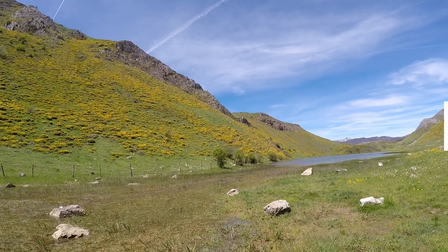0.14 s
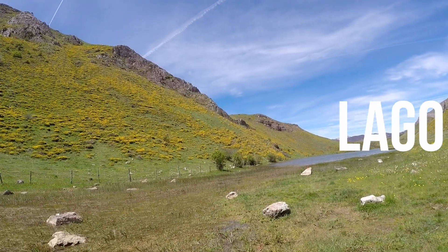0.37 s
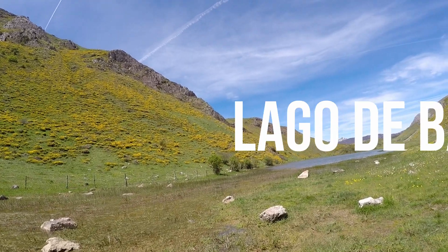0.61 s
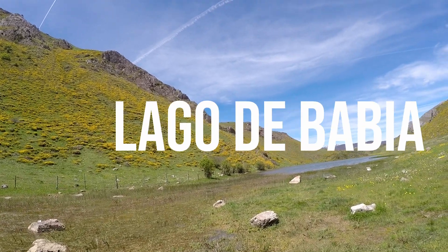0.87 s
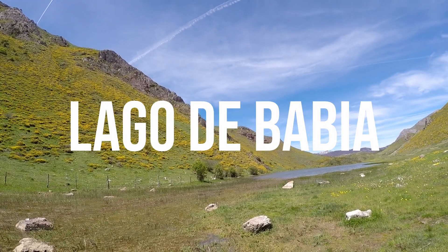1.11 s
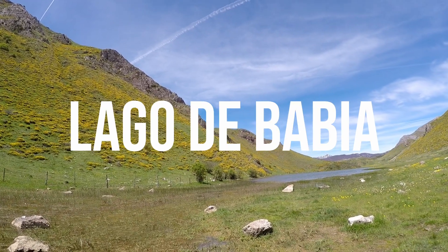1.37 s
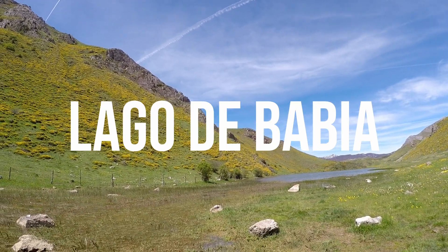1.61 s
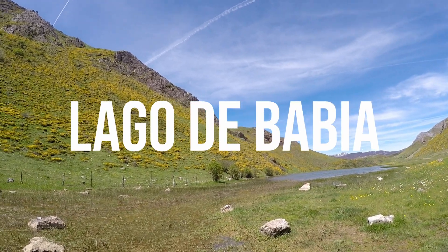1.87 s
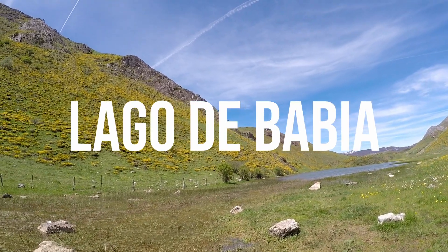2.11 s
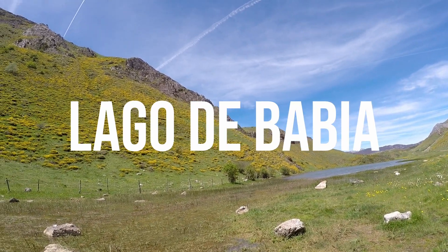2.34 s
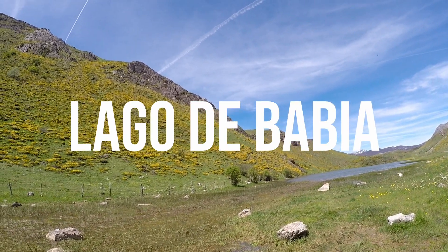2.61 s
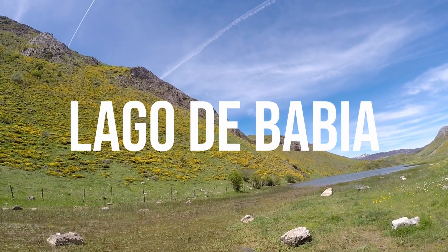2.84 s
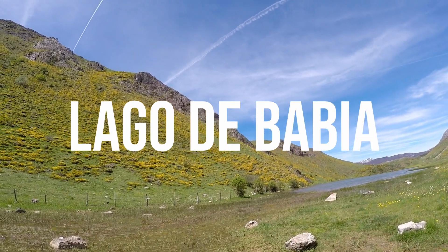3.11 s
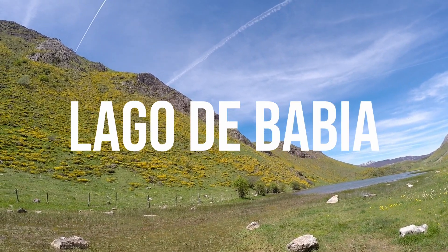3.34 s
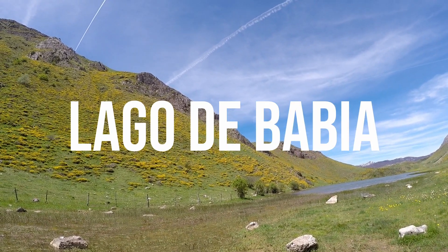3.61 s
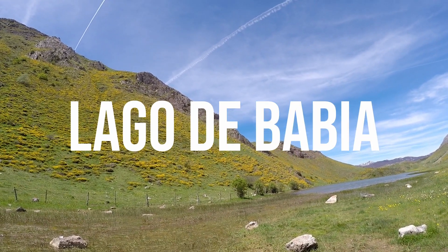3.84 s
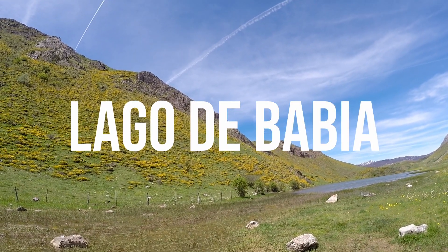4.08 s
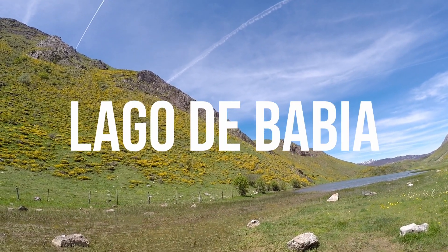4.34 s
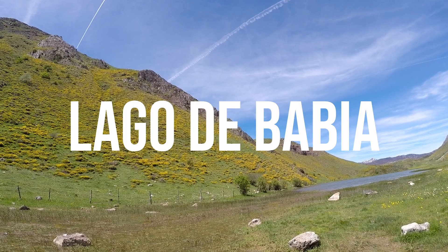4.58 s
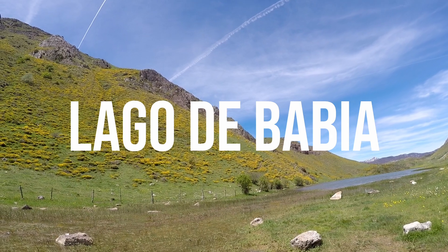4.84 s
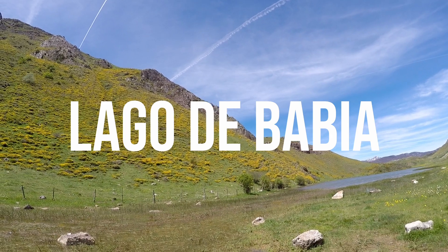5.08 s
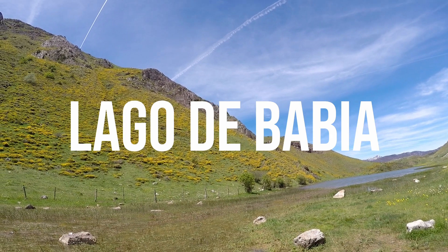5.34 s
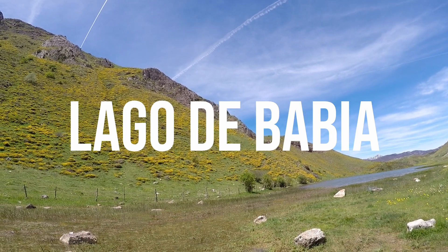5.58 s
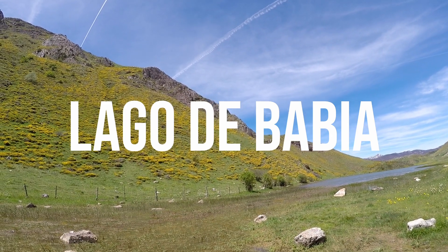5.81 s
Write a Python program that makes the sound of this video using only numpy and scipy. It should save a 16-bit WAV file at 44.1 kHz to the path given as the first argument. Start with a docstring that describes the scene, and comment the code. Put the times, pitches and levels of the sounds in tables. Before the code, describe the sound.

Near frogs give dry, ringing, ratchet-like croaks over a grainy blur of farther ones, with wind buffeting the microphone outdoors.

```python
"""A chorus of frogs rattles by a lake while gusts of wind buffet a small microphone.
Each croak is a run of short bursts of clicks that ring in a vocal sac, swelling and fading.
Near and shrill frogs stand out over a blur of farther ones; hoarse moans are quicker buzzes of clicks.
Shaped noise makes the wind, the air and a few dry ticks; steady tones make two thin insect chirps."""
import sys
import numpy as np
from scipy import signal
from scipy.io import wavfile
from scipy.ndimage import uniform_filter1d

SR = 44100
rng = np.random.default_rng(int(sys.argv[2]) if len(sys.argv) > 2 else 0)


def store_wav(level_fs):
    """Save 16-bit WAV to argv[1]."""
    pcm = np.round(np.clip(np.atleast_2d(level_fs), -1, 1) * 32767)
    wavfile.write(sys.argv[1], SR, pcm.T.astype(np.int16))


def invert_db(x):
    """Field ratio 10**(x/20) for x, a level in decibels (scalar or array-like)."""
    u = np.asarray(x, float) / 20
    return 10 ** u


N = 262395  # length in samples, just under 6 s


def evened(x):
    """Scales to rms 1."""
    return x / np.sqrt(np.mean(x ** 2) + 1e-20)


def over_time(table):
    """Joins the points of each column by straight lines, one value a sample."""
    s, *columns = np.transpose(table)
    return [np.interp(np.arange(N) / SR, s, column) for column in columns]


def around(s):
    """The samples that a run of bursts occupies, with 0.1 s to spare at each end."""
    return slice(max(round((s[0] - .1) * SR), 0), round((s[-1] + .1) * SR))


def bursts(s, db, gap, last_gap, uneven, grow_db, scatter_db, count=5):
    """Short click trains ending at times s; a positive grow_db swells them towards their last click."""
    chance = rng.standard_normal((len(s), 2, count))
    # clicks are counted backwards from the last one; gaps are in seconds
    gaps = gap * np.exp(uneven * chance[:, 0])
    gaps[:, 0] = 0
    gaps[:, 1] *= last_gap / gap
    before = np.arange(count)
    scatter = scatter_db * chance[:, 1] * (before > 0)
    size_db = db[:, None] - grow_db * before ** 2 + scatter
    at = np.round((s[:, None] - np.cumsum(gaps, 1)) * SR).astype(int)
    inside = (at >= 0) & (at < N)
    return np.bincount(at[inside], invert_db(size_db)[inside], N)


def ring(clicks, hz, t60, rise):
    """A resonance: every click rings at hz, with a rise and a decay of 60 dB in t60 seconds."""
    t = np.arange(1200) / SR
    shape = invert_db(-60 * t / t60) * (1 - np.exp(-t / rise)) ** 2
    turn = np.exp(2j * np.pi * np.cumsum(hz * np.ones(len(clicks))) / SR)
    # shift the pitch down to zero, shape the clicks, shift back up
    shaped = signal.oaconvolve(clicks / turn, shape / shape.max())[:len(clicks)]
    return (turn * shaped).real


def noise(spectrum, size, patchy_db, patch_frames, patch_bins):
    """Noise of a given colour, from random short-time spectra with louder and softer patches."""
    hop = size // 4
    hz = np.fft.rfftfreq(size, 1 / SR)
    a, b, patches = rng.standard_normal((N // hop + 5, len(hz), 3)).T
    patches = uniform_filter1d(patches, patch_bins, 0)
    patches = evened(uniform_filter1d(patches, patch_frames, 1))
    f, db = np.transpose(spectrum)
    colour_db = np.interp(np.log(hz + 1), np.log(f + 1), db, left=db[0] - 19, right=-90)
    spectra = (a + 1j * b) * invert_db(colour_db[:, None] + patchy_db * patches)
    return evened(signal.istft(spectra, nperseg=size, noverlap=size - hop)[1][:N])


# the nearest frogs by name: sac_hz, upper_hz, upper_db, snap_db, slowing (share, 0-1)
FROGS = {"high": (2640, 4350, -18, -19.5, .1), "lazy": (2450, 4650, -20, -25.5, .12),
         "even": (2490, 4600, -18, -24, .02), "low": (2300, 4650, -17.5, -27, .06),
         "dull": (2280, 4300, -26, -15, .02)}
# their croaks: frog (name), first_burst_s, last_burst_s, bursts (count), click_level_db (at fullest effort)
NEAR_CROAKS = [("high", -.186, .18, 9, -14), ("high", .128, .443, 8, -20), ("low", .796, 1.076, 8, -19),
               ("high", .956, 1.64, 17, -17), ("high", 1.57, 1.79, 6, -20), ("lazy", 1.829, 2.362, 13, -17),
               ("even", 2.455, 2.905, 11, -19), ("low", 3.014, 3.338, 9, -19.5),
               ("high", 3.31, 3.525, 6, -23), ("lazy", 3.55, 4.076, 13, -15), ("low", 4.062, 4.262, 6, -19),
               ("even", 4.118, 4.562, 11, -32), ("dull", 4.708, 5.127, 11, -23.5),
               ("low", 5.118, 5.4, 8, -16.5), ("high", 5.495, 5.62, 4, -39), ("dull", 5.875, 6.05, 5, -29)]
LOUDEST_AT = .5  # share of the croak at which effort is fullest
START_DB, END_DB = -7, -7.5  # effort at either end of the croak
SAC_PER_DB = .01  # the sac tightens with effort: share of pitch per dB


def near_frogs():
    """Clicks ring the sac, a shorter upper resonance and a brief snap between them in pitch."""
    out, t = np.zeros(N), np.arange(N) / SR
    for frog, first, last, count, click_db in NEAR_CROAKS:
        sac_hz, upper_hz, upper_db, snap_db, slowing = FROGS[frog]
        u = np.linspace(0, 1, count)
        s = first + (last - first) * (u - slowing * u * (1 - u))
        span = around(s)
        swelling_db = START_DB * (1 - u / LOUDEST_AT) ** 2
        fading_db = END_DB * ((u - LOUDEST_AT) / (1 - LOUDEST_AT)) ** 2
        effort_db = np.where(u < LOUDEST_AT, swelling_db, fading_db)
        clicks = bursts(s, click_db + effort_db, gap=.0056, last_gap=.008,
                        uneven=.1, grow_db=1.1, scatter_db=2.1)[span]
        upper = invert_db(upper_db) * ring(clicks, upper_hz, t60=.009, rise=.00015)
        snap = invert_db(snap_db) * ring(clicks, 3650, t60=.005, rise=.0001)
        tightness = 1 + SAC_PER_DB * np.interp(t[span], s, effort_db)
        sac = ring(clicks, sac_hz * tightness, t60=.011, rise=.0003)
        out[span] += sac + upper - snap
    return out


# croaks of shriller frogs: first_burst_s, last_burst_s, bursts (count), high_ring_hz,
# high_ring_level_db, low_ring_level_db
SHRILL_CROAKS = [(-.1, .188, 8, 5200, -52, -28), (0.878, 1.352, 13, 5150, -43, -23.5),
                 (2.062, 2.148, 3, 4130, -37, -26), (2.39, 2.753, 10, 5300, -47.5, -28),
                 (2.871, 3.063, 7, 5130, -43, -28), (3.207, 3.561, 9, 5220, -46, -27),
                 (3.594, 3.863, 7, 4080, -33.5, -28), (3.893, 4.32, 11, 5080, -43.5, -25),
                 (4.71, 5.004, 8, 5100, -43, -30), (5.12, 5.443, 9, 5000, -42, -24),
                 (5.865, 5.937, 3, 5200, -52, -39)]
SINK = .1  # share of pitch that the low ring loses along a croak


def shrill_frogs():
    """Evenly paced bursts of quick clicks ring both high and low."""
    out = np.zeros(N)
    for first, last, count, high_hz, high_db, low_db in SHRILL_CROAKS:
        s = np.linspace(first, last, count)
        span = around(s)
        effort_db = -4 * np.linspace(-1, 1, count) ** 2  # loudest mid-croak
        clicks = bursts(s + .004, effort_db, gap=.0055, last_gap=.0055,
                        uneven=.14, grow_db=1.4, scatter_db=2.0)[span]
        low_hz = 2100 * np.linspace(1, 1 - SINK, len(clicks))
        out[span] += invert_db(high_db) * ring(clicks, high_hz, t60=.012, rise=.0004)
        out[span] += invert_db(low_db) * ring(clicks, low_hz, t60=.013, rise=.0004)
    return out


# loudness of the farther chorus, before echo and filters: time_s, level_db
FAR_LEVEL = [(0.0, -37), (0.48, -47.5), (0.96, -45), (1.8, -41), (2.1, -44), (2.42, -36), (2.7, -42),
             (3.45, -40), (4.16, -38), (4.32, -46), (4.62, -50), (5.28, -35), (5.5, -54), (5.84, -62),
             (5.96, -42)]


def far_frogs():
    """Several unseen frogs, each at its own pace and pitch, overlap into a grainy blur."""
    out = np.zeros(N)
    # bursts a second, ring in Hz, level in dB relative to each other
    for pace, hz, db in [(23.57, 1916, -1), (26.82, 1353, -16), (21.21, 2168, 5.5),
                         (25.02, 2550, 2.5), (22.74, 4300, -14.5), (23.8, 5200, -17)]:
        s = np.cumsum(np.exp(.2 * rng.standard_normal(200))) / pace - .1
        clicks = bursts(s, np.full(len(s), db), gap=.0046, last_gap=.0048,
                        uneven=.15, grow_db=-.4, scatter_db=3.0)
        out += ring(clicks, hz, t60=.0068, rise=.00039)
    return invert_db(over_time(FAR_LEVEL)[0]) * evened(out)


def shore(x):
    """Scattered reflections from water, reeds and slopes, dying by 60 dB in 0.16 s."""
    t = np.arange(8000) / SR
    scattered = rng.random(len(t)) < .05
    taps = rng.standard_normal(len(t)) * scattered * invert_db(-60 * t / .16)
    return signal.oaconvolve(x, taps / np.linalg.norm(taps))[:N]


# wind at the microphone, before the lumps: time_s, rumble_db, flutter_db
GUSTS = [(0.0, -25, -23), (0.1, -20, -22.5), (0.44, -22, -31), (0.56, -26, -41.5), (0.68, -22, -34.4),
         (0.86, -33, -46.5), (1.1, -23.4, -39.5), (1.26, -27, -46), (1.5, -22, -38.5), (1.66, -27, -46),
         (1.78, -19, -24), (1.94, -28.5, -43.5), (2.28, -17.5, -28), (2.38, -15, -16), (2.62, -19.5, -27.5),
         (2.88, -17.5, -23.5), (3.0, -23, -39), (3.46, -23.5, -40.5), (3.54, -16.5, -25), (3.94, -20, -38),
         (4.1, -18, -29), (4.7, -19, -29), (5.28, -19.5, -22.5), (5.44, -26.5, -46.5), (5.56, -18.5, -26),
         (5.94, -21, -30)]
# colour of the rumble: pitch_hz, relative_level_db (per Hz)
RUMBLE_COLOUR = [(20, -0.5), (119, -6), (210, -13.5), (260, -21), (700, -51)]
# colour of the flutter: pitch_hz, relative_level_db (per Hz)
FLUTTER_COLOUR = [(60, -21.5), (200, 2), (430, -8), (640, -27), (1300, -40)]


def wind():
    """Eddies press on the membrane: a rumble, and a quicker flutter in the gusts, in shared lumps."""
    rumble_db, flutter_db = over_time(GUSTS)
    lumps = uniform_filter1d(rng.standard_normal(N), 900)
    lumps = evened(uniform_filter1d(lumps, 900))
    rumble = noise(RUMBLE_COLOUR, size=2048, patchy_db=1.0, patch_frames=4, patch_bins=4)
    flutter = noise(FLUTTER_COLOUR, size=512, patchy_db=2.0, patch_frames=8, patch_bins=9)
    rumble *= invert_db(rumble_db + 1.94 * lumps)
    flutter *= invert_db(flutter_db + 1.77 * lumps)
    return rumble + flutter


# colour of the air: pitch_hz, relative_level_db (per Hz)
AIR_COLOUR = [(700, 2), (2400, 0), (3300, -8.5), (5300, -8.5), (6000, -16.5), (8000, -20.5), (13500, -22.5),
              (15500, -39.5)]


def air():
    """A soft, steady hiss of coloured noise at -56 dB rms."""
    return invert_db(-56) * noise(AIR_COLOUR, size=1024, patchy_db=.6, patch_frames=10, patch_bins=12)


# hoarse moans, mostly falling: start_s, end_s, click_level_db (before the throb), sac_from_hz, sac_to_hz
MOANS = [(0.132, 0.39, -43.5, 1800, 1530), (0.472, 0.622, -39.5, 2380, 1280), (0.624, .73, -37, 2450, 1750),
         (1.33, 1.495, -40.5, 1860, 1490), (1.963, 2.125, -39.5, 1630, 1310),
         (2.183, 2.298, -43, 1100, 1250), (2.426, 2.57, -38, 1900, 1310), (2.812, 2.96, -41, 1700, 1130),
         (3.337, 3.499, -44, 2010, 1300), (3.58, 3.85, -40, 1700, 1490), (5.045, 5.406, -47.5, 1640, 1450),
         (5.622, 5.82, -44, 1700, 950)]


def moans():
    """A quick, throbbing buzz of clicks that stumbles and slows while the sac glides in pitch."""
    t, clicks, sac_hz = np.arange(N) / SR, np.zeros(N), np.full(N, 1500.)
    hoarse = np.exp(.15 * evened(uniform_filter1d(rng.standard_normal(N), 150)))
    for start, end, db, from_hz, to_hz in MOANS:
        on = (t >= start) & (t < end)
        u = (t[on] - start) / (end - start)
        sac_hz[on] = from_hz * (to_hz / from_hz) ** u ** .65
        clicks_per_s = (330 - 120 * u) * hoarse[on]
        # one click each time the running count passes a whole number
        beat = np.diff(np.floor(np.cumsum(clicks_per_s) / SR), prepend=0)
        throb_db = 5 * np.cos(2 * np.pi * 34 * (t[on] - start - .01))
        clicks[on] += beat * invert_db(db + throb_db) * signal.windows.tukey(len(u), .1)
    clicks *= invert_db(2.2 * rng.standard_normal(N))  # uneven click strength
    sac = ring(clicks, sac_hz, t60=.012, rise=.0004)
    upper = invert_db(-13) * ring(clicks, 2750, t60=.012, rise=.00084)
    return sac + upper


# dry ticks: start_s, level_db (rms before the decay), band_hz, decay_s (to 1/e)
TICKS = [(0.344, -50, 6000, .012), (0.383, -53, 6130, .012), (0.477, -55, 13500, 0.002),
         (0.474, -52, 5400, .006), (0.731, -47, 6500, 0.0047), (3.342, -58, 6060, .008),
         (3.38, -60, 6200, .01), (5.496, -31, 900, 0.006)]


def ticks():
    """Sharp puffs of noise in a band around a given pitch, each dying away quickly."""
    out, t = np.zeros(N), np.arange(1500) / SR
    for s, db, hz, decay in TICKS:
        band = signal.butter(4, [.7 * hz, 1.15 * hz], "band", fs=SR, output="sos")
        puff = evened(signal.sosfilt(band, rng.standard_normal(len(t))))
        out[round(s * SR):][:len(t)] += invert_db(db) * puff * np.exp(-t / decay)
    return out


# insect chirps: start_s, end_s, pitch_hz, level_db (peak of the lower tone)
CHIRPS = [(3.686, 3.767, 6770, -72), (4.425, 4.5, 6620, -72)]


def chirps():
    """A thin steady tone with its octave, faded in and out."""
    out = np.zeros(N)
    for start, end, hz, db in CHIRPS:
        t = np.arange(round((end - start) * SR)) / SR
        octave = invert_db(-8) * np.sin(4 * np.pi * hz * t)
        tone = np.sin(2 * np.pi * hz * t) + octave
        out[round(start * SR):][:len(t)] += invert_db(db) * tone * signal.windows.tukey(len(t), .3)
    return out


def scene():
    """All frogs gain echoes and lose top treble and bass; wind, air and small sounds are added."""
    frogs = near_frogs() + shrill_frogs() + far_frogs() + moans()
    frogs += invert_db(-13) * shore(frogs)
    treble_cut = signal.butter(12, 5500, fs=SR, output="sos")
    bass_cut = signal.butter(2, 1100, "high", fs=SR, output="sos")
    frogs = signal.sosfilt(bass_cut, signal.sosfilt(treble_cut, frogs))
    return (frogs + wind() + air() + ticks() + chirps())[None]  # one channel


def top_cut(x):
    """Nothing passes above the cut-off."""
    return signal.sosfilt(signal.butter(12, 15300, fs=SR, output="sos"), x)


def record(dry):
    """Turns the finished mix into the sound that is kept."""
    return top_cut(dry)


dry = scene()
out = record(dry)
store_wav(out)
```